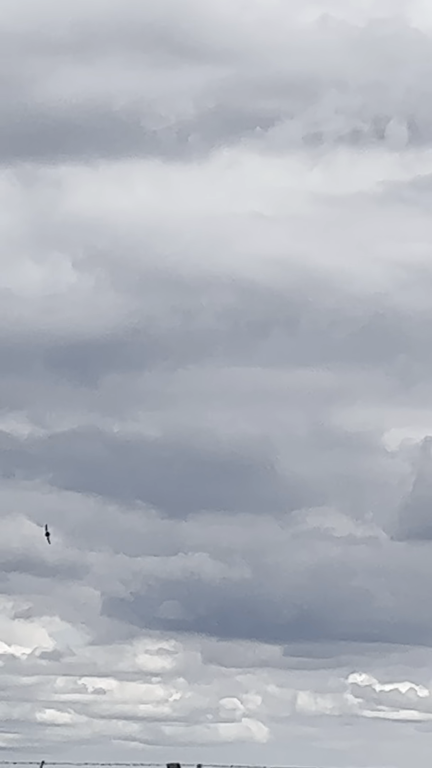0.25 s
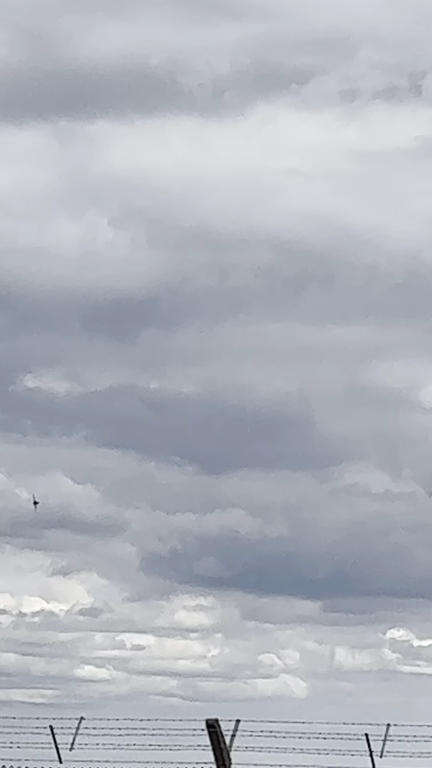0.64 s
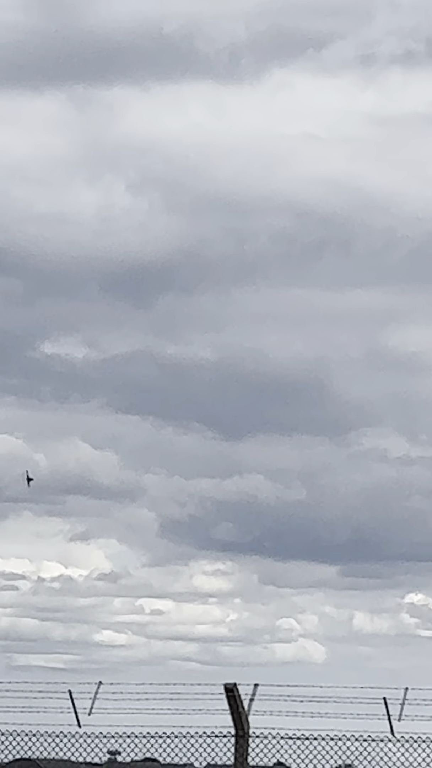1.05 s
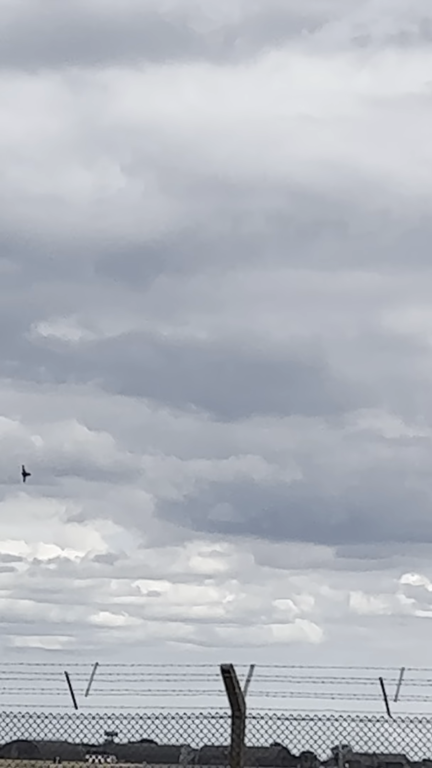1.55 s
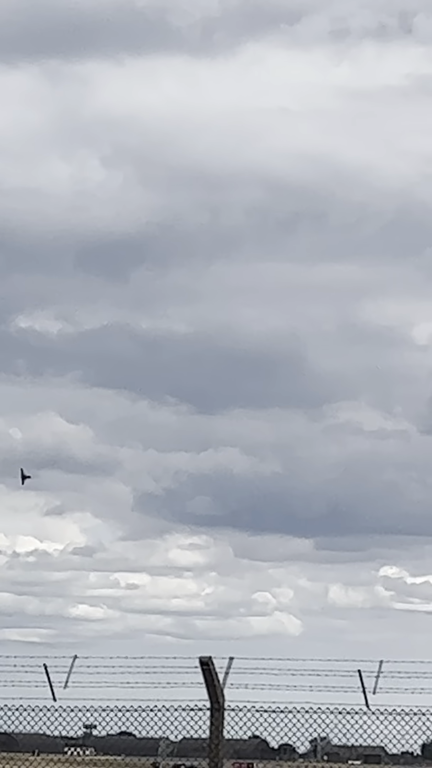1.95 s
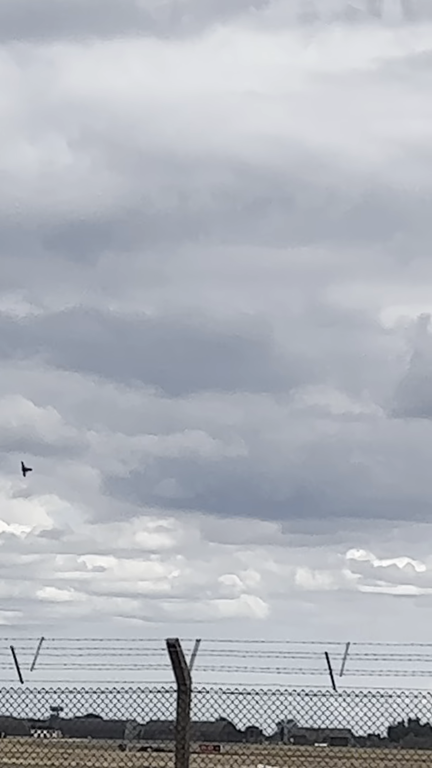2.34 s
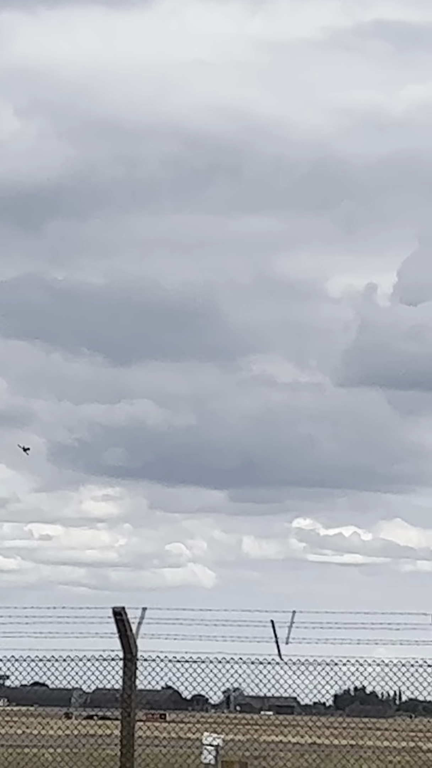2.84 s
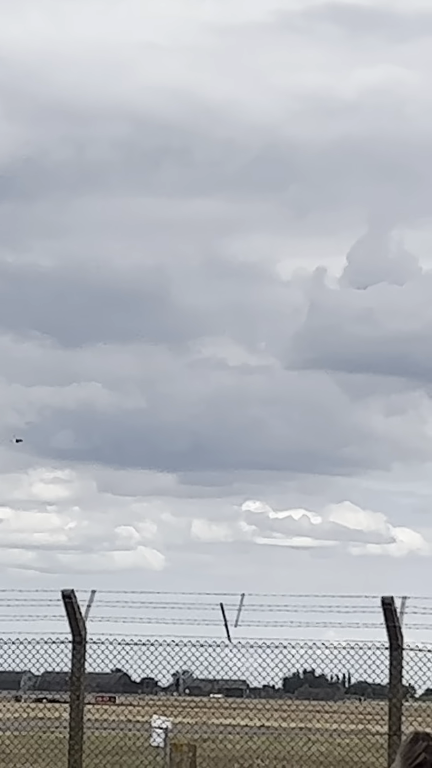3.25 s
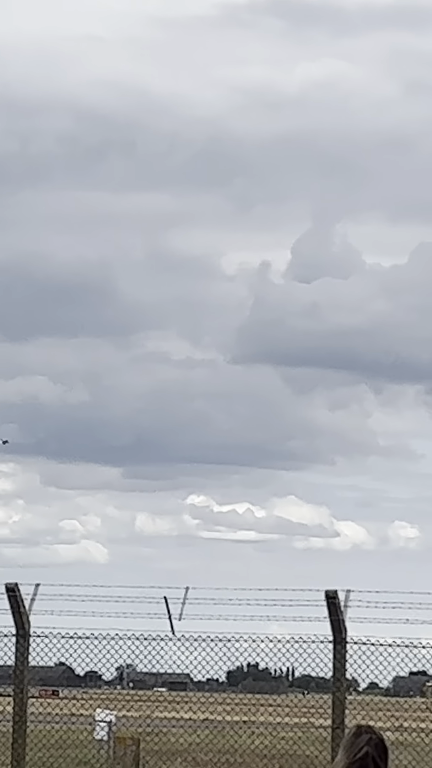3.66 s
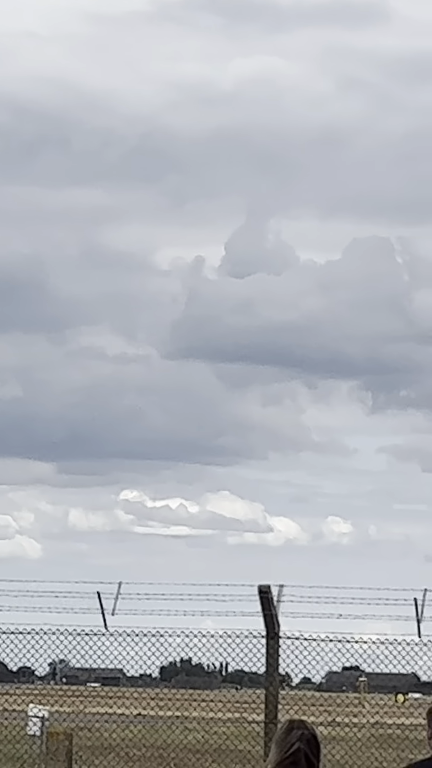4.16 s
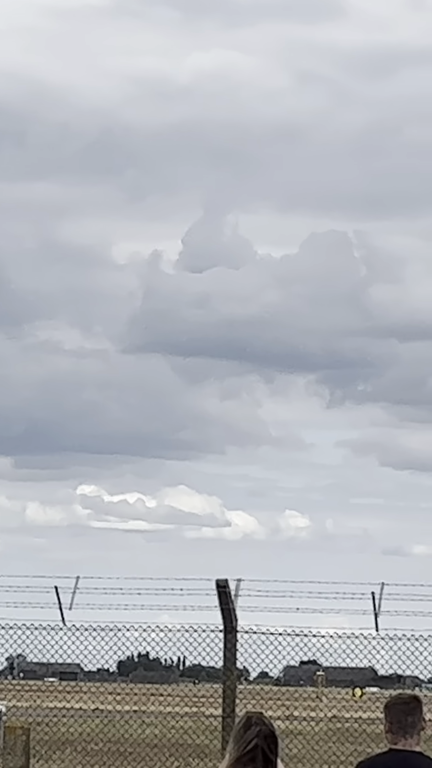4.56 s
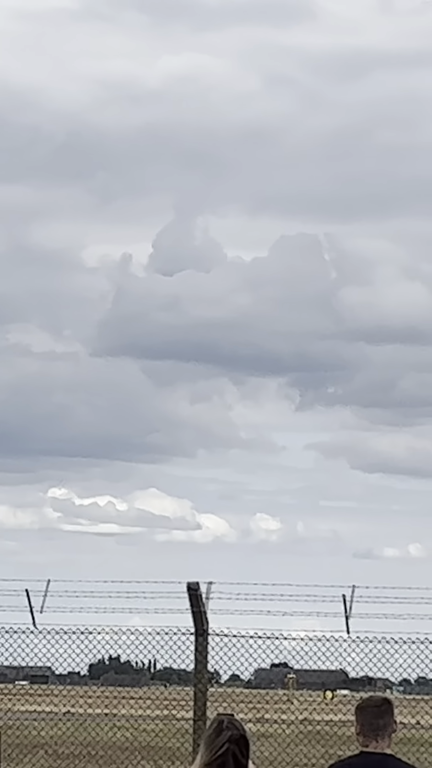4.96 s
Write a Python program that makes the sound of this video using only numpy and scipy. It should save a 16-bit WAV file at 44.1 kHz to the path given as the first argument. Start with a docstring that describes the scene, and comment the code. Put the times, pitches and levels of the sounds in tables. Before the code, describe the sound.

A twin-engine jet fighter flies away over an open airfield. Its loud, bassy exhaust roar surges and flutters in turbulent air, with small crackles and sharp cracks. A dense burst of crackle comes past the middle, then the roar darkens and sinks to distant rumble. Handheld outdoor stereo pickup, right side louder, with hardly any breeze.

```python
"""A bright exhaust roar is heard first: a twin-engine jet fighter flies away over an open airfield.
Mixing noise of its jets, made of noise bands, surges and fades in turbulent air, with sliding emphases.
Random small shocks crackle and listed strong shocks crack and thud on top: steps that relax, edges rounded.
Distance takes the treble first, leaving a rumble scattered by the field and the hangars.
A faint image of the low roar lies around 9.6 kHz, shifted up by a carrier; a breeze rustles below."""
import sys
import numpy as np
from scipy import signal
from scipy.fft import rfft, irfft, next_fast_len
from scipy.io import wavfile
from scipy.ndimage import uniform_filter1d, minimum_filter1d

SR = 44100
rng = np.random.default_rng(int(sys.argv[2]) if len(sys.argv) > 2 else 0)


def dump_mix(stems):
    """Bounce the given channels to the path in sys.argv[1] as a 16-bit WAV at rate SR."""
    frames = np.atleast_2d(stems).T  # one column per channel
    limited = np.clip(frames, -1, 1)  # hard clip at full scale
    pcm = np.round(limited * 32767).astype(np.int16)
    wavfile.write(sys.argv[1], SR, pcm)


N = 229529
TIME = np.arange(N) / SR
SIZE = next_fast_len(N + 8192)
FREQ = np.maximum(np.arange(SIZE // 2 + 1) * SR / SIZE, 1)
SIDES = np.array([[-1], [1]])   # left, right


def from_db(db):
    """Decibels to gain."""
    return 10 ** (np.asarray(db) / 20)


def rms_one(x):
    """Scale to unit power."""
    return x / np.sqrt(np.mean(np.abs(x) ** 2) + 1e-20)


def in_time(rows):
    """Each column of a curve at every sample."""
    s, *columns = np.transpose(rows)
    return [np.interp(TIME, s, c) for c in columns]


def at_hz(points, hz, axis=1):
    """One column of a table, read on a log-frequency axis."""
    table = np.array(points)
    return np.interp(np.log(hz), np.log(table[:, 0]), table[:, axis])


def bell(offset, width):
    """Smooth hump of height 1, the given width across at half height."""
    return .5 ** ((2 * offset / width) ** 2)


def drift(rate_hz):
    """Slow chance with a spread of 1: noise through two equal low-pass poles."""
    hop = 40
    r = np.exp(-2 * np.pi * rate_hz * hop / SR)
    settle = 2000
    noise = rng.standard_normal(N // hop + settle + 2)
    slow = signal.lfilter([1], [1, -2 * r, r * r], noise)[settle:]
    return np.interp(np.arange(N) / hop, np.arange(len(slow)), rms_one(slow))


def noise_spectrum(colour_db):
    """Spectrum of random noise with the given colour, scaled to unit-power weighting."""
    return rfft(rng.standard_normal(SIZE)) * rms_one(from_db(colour_db))


def band(spectrum, hz, step_oct):
    """Analytic signal of one band; bands step_oct apart add up to the whole."""
    weight = np.maximum(1 - np.abs(np.log2(FREQ / hz)) / step_oct, 0)
    return np.fft.ifft(2 * spectrum * weight, SIZE)[:N]


def steadied(z, evenness, window_s):
    """Hold back the slow chance swells of a noise band, keeping its fast grain."""
    power = uniform_filter1d(np.abs(z) ** 2, int(window_s * SR)) + 1e-20
    return z * (power / power.mean()) ** (-evenness / 2)


# the jet turns its tail and recedes:
# [t/s, deep rumble level/dB, roar level/dB, treble over roar level/dB]
RECEDING = [(0, 4, 2.5, 8), (.3, -4.5, -3.5, 8), (1.1, -2, 5.5, -1.5), (1.65, -0.5, -2, 2.5),
            (2.3, -5, -0.5, -3.5), (2.9, 1, 6, -10), (3.55, -2, -1.5, -5), (4.05, 2, -6, -4.5),
            (4.5, -3.5, -5, -12.5), (4.95, 3.5, -12, -7), (5.2, 11, -18.5, -1)]
RUMBLE_BELOW_HZ, TREBLE_ABOVE_HZ = 100, 1120


def passage_db(hz):
    """Slow level at one pitch: the deep rumble carries, the roar fades, the treble goes first."""
    rumble_db, roar_db, treble_db = in_time(RECEDING)
    deep = 1 / (1 + (hz / RUMBLE_BELOW_HZ) ** 2)
    treble = hz / (hz + TREBLE_ABOVE_HZ)
    return deep * rumble_db + (1 - deep) * roar_db + treble * treble_db


# a sharp focus sweeps over the listener, switching the roar on and off:
# [start t/s, end t/s, gain level/dB, centre f/Hz, breadth/octaves]
SHARP_FOCUS = [(0, .063, 5.5, 1700, 3.2), (.858, 0.97, 7.5, 300, 2.9), (0.945, .991, 9, 2600, 1.2),
               (1.198, 1.284, 3.5, 370, 7.5), (1.406, 1.52, 4.5, 703, 4.1), (1.974, 2.061, 8, 1300, 2.15),
               (2.173, 2.248, 8.5, 1026, 1.3), (2.743, 2.797, 9.5, 1350, 1.8), (2.756, 2.809, 7, 460, 1.9),
               (3.23, 3.302, 6.5, 220, 2.8)]
BURST_EDGE_S = .003   # tanh time constant


def bursts_db(hz):
    """Each burst holds its level between two steep edges, most strongly around its own pitch."""
    coarse = TIME[::32]
    gain_db = np.zeros(len(coarse))
    for start, end, db, centre_hz, breadth_oct in SHARP_FOCUS:
        opening = np.tanh((coarse - start) / BURST_EDGE_S)
        shutting = np.tanh((coarse - end) / BURST_EDGE_S)
        gain_db += db * (opening - shutting) / 2 * bell(np.log2(hz / centre_hz), breadth_oct)
    return np.interp(TIME, coarse, gain_db)


RISE_SHARE = 0.58   # part of a surge's length spent building up
SURGE_STEEPNESS = 2.2   # 2 is a bell, more is squarer


def swell(since_crest_s, length_s):
    """Hump with a full top that builds slowly and collapses faster; length is at half height."""
    flank_s = length_s * np.where(since_crest_s < 0, RISE_SHARE, 1 - RISE_SHARE)
    return .5 ** (np.abs(since_crest_s / flank_s) ** SURGE_STEEPNESS)


# turbulent air focuses the roar, or briefly bends it away (negative gain):
# [crest t/s, length/s, gain level/dB, centre f/Hz, breadth/octaves]
AIR_FOCUS = [(0.146, 0.098, 6.5, 2450, 0.66), (.16, 0.072, -3.5, 520, 0.71), (.245, .1, -5, 280, 0.45),
             (.37, 0.17, 7, 2400, 0.57), (0.258, 0.074, 6.5, 750, 1.2), (.4, 0.41, -6.5, 146.4, 1.27),
             (0.458, 0.063, 2, 1480, 7.7), (0.64, 0.045, 4, 300, 5.6), (.705, 0.068, -2, 300, 2.2),
             (0.813, 0.41, 6.5, 2500, 0.76), (0.851, 0.043, 7, 700, 3.4), (1.05, 0.062, -5, 300, 0.53),
             (1.25, 0.4, 2.5, 2450, .6), (1.122, 0.15, 4, 900, 0.8), (1.16, 0.038, -8, 520, .6),
             (1.335, 0.064, 3.5, 419, 4.8), (1.335, 0.042, -8, 1250, 0.43), (1.44, .08, 4.5, 200, 1),
             (1.56, 0.07, -7, 800, 0.9), (1.635, 0.071, -3.5, 400, 2.4), (1.726, 0.49, 5.5, 1266, 1.3),
             (1.834, 0.092, 5.5, 1870, 1.3), (1.8, 0.031, 11.5, 650, 0.33), (1.885, 0.12, 7, 322, 2.2),
             (1.925, 0.039, -5.5, 950, 0.73), (2.12, .07, -5.5, 700, 0.94), (2.254, 0.11, -5, 148, 1.8),
             (2.33, 0.029, 5.5, 900, 1.9), (2.44, 0.069, 7.5, 680, 2.3), (2.578, 0.064, 8, 650, 1.4),
             (2.635, 0.17, 9, 1000, 1.75), (2.634, 0.047, 7, 1450, 0.86), (2.705, .025, 5.5, 1200, 0.7),
             (2.73, 0.026, -3.5, 1154, 0.95), (2.86, 0.063, -7.5, 243, 1.2), (3.046, 0.56, 4, 200, 1.5),
             (3, 0.2, 2.5, 380, .7), (3.05, .09, 6.5, 100, 0.72), (3.275, 0.11, -9, 530, 0.42),
             (3.36, 0.055, -7, 353, 0.73), (3.48, .16, 4, 330, 0.78), (3.33, 0.25, 6.5, 100, 0.92),
             (3.457, 0.42, 9, 747, 10), (3.473, 0.047, 2.5, 1000, 2.8), (3.439, 0.3, -3, 1750, 0.72),
             (3.607, .07, 7.5, 1400, 0.46), (3.867, 0.22, 4, 300, 16), (4.17, 0.18, -4.5, 470, 0.49),
             (4.283, 0.065, 9.5, 700, 0.67), (4.3, 0.3, 3, 230, 0.93), (4.4, 0.59, 1.2, 1000, 1.3),
             (4.51, .07, -8.5, 320, 0.81), (4.639, 0.049, 4.5, 890, 3.5), (4.85, .12, -3.5, 350, 0.92),
             (4.995, 0.08, 6, 300, 0.77), (5, 0.45, -2.5, 2300, 0.7), (5.137, 0.14, -15, 524, 0.49)]


def surges_db(hz):
    """Each surge builds and collapses, most strongly around its own pitch."""
    coarse = TIME[::64]
    gain_db = np.zeros(len(coarse))
    for crest, length_s, db, centre_hz, breadth_oct in AIR_FOCUS:
        gain_db += db * swell(coarse - crest, length_s) * bell(np.log2(hz / centre_hz), breadth_oct)
    return np.interp(TIME, coarse, gain_db)


def roar_level_db(hz):
    """Passage, surges and bursts together at one pitch."""
    return passage_db(hz) + surges_db(hz) + bursts_db(hz)


def second_path(spectrum, share, lag_s, wander, rate_hz):
    """A second ray, bent by the wind, comes a little later: its comb sweeps through the noise."""
    x, n = irfft(spectrum, SIZE), np.arange(SIZE)
    lag = np.pad(lag_s * SR * np.exp(wander * drift(rate_hz)), (0, SIZE - N), mode="edge")
    return rfft(x + share * np.interp(n - lag, n, x)) / np.sqrt(1 + share ** 2)


# direct and reflected sound reinforce each other in a sliding band:
# [start t/s, length/s, from f/Hz, to f/Hz, emphasis level/dB before SLIDE_DB]
REINFORCED = [(0.065, .13, 464, 347, 4), (0.209, .14, 724, 1130, 1.5), (0.317, 0.19, 662, 335, 6),
              (0.716, 0.12, 642, 572, 8.5), (0.756, .26, 234, 197.8, 3), (0.855, 0.12, 526, 323, 0),
              (1.082, 0.083, 1166, 682, 3), (1.17, 0.13, 373, 350, 10.5), (1.097, 0.33, 259.4, 258.7, 7.5),
              (1.285, .14, 620, 241, 8.5), (1.441, 0.15, 329.5, 486, 11.5), (1.791, 0.2, 371, 305, 5),
              (1.813, 0.33, 132.5, 103.2, 12.5), (2.536, .14, 654, 572, 5), (2.809, 0.06, 825, 734, 8),
              (2.858, 0.31, 393, 427, 7), (2.945, 0.53, 301, 209.4, 6), (3.197, 0.22, 297, 240, -2),
              (3.257, 1, 143.2, 68.5, 7.5), (3.794, 0.17, 229, 218, 8), (4.046, 0.098, 270, 201.7, 8),
              (4.206, 0.14, 375.4, 351, 3), (4.577, 0.14, 434, 487, 3.5)]
SLIDE_DB = 1   # added to every emphasis


def sliding_bands(spectrum, width, trough_width, evenness):
    """Each reinforced band fades in, glides and out, troughs beside it; widths are shares of its pitch."""
    x = irfft(spectrum, SIZE)
    out = x.copy()
    for start, length_s, from_hz, to_hz, db in REINFORCED:
        during = np.flatnonzero((TIME > start) & (TIME < start + length_s))
        progress = (TIME[during] - start) / length_s
        glide_hz = from_hz * (to_hz / from_hz) ** progress
        glide = np.exp(2j * np.pi * np.cumsum(glide_hz) / SR)
        # follow the glide, so the band stands still around 0 Hz
        around = np.fft.fft(x[during] / glide)
        offset = np.fft.fftfreq(len(during), 1 / SR) / np.sqrt(from_hz * to_hz)
        broad = np.fft.ifft(around * bell(offset, trough_width))
        narrow = np.fft.ifft(around * bell(offset, width))
        strength = np.sqrt(np.mean(np.abs(broad) ** 2) * width / trough_width)
        narrow = strength * rms_one(steadied(narrow, evenness, window_s=0.023))
        change = (from_db(db + SLIDE_DB) * narrow - broad) * glide
        out[during] += 2 * np.sin(np.pi * progress) * change.real
    return rfft(out)


# [t/s, right-side lead/ms at full openness (negative: left leads),
#  right over left level/dB at full shading, scattered share/0-1 at full openness]
SIDE_ARRIVAL = [(0, .17, 5.5, .04), (1.0, .14, 5, .04), (1.4, .1, 5, .1), (1.62, .04, 3.5, .45),
                (1.9, .04, 6, .08), (2.5, .02, 8, .05), (3.0, .04, 8, .12), (3.45, .02, 7.5, .03),
                (4.1, 0, 6, .1), (4.33, -.05, 5.5, .3), (4.6, -.03, 6, .1), (4.9, -.15, 1.5, .6),
                (5.2, -.35, 1, .6)]
# difference of the two sides: [f/Hz, shading/0-1, openness/0-1]
SIDE_DIFFERENCE = [(60, .1, .8), (150, .2, 1), (300, .36, 1), (480, .55, 1), (640, .9, 1), (830, .5, 1),
                   (1100, 1, 1), (1350, .9, .8), (1700, .12, .16), (2200, .01, .03)]
# relative exhaust spectrum: [f/Hz, density level/dB per Hz]
EXHAUST_COLOUR = [(20, -43), (31, -22), (50, 1.5), (80, -1.5), (118, 1.5), (200, 1), (320, 0.5),
                  (450, -0.1), (700, -3.5), (1350, -13.5), (1680, -20), (2450, -28), (3150, -37),
                  (4100, -55), (7000, -101)]
EXHAUST_DB = -24   # before passage, surges and bursts


def exhaust(flutter_db, patchy_db, rasp_db):
    """Mixing noise of the receding jets; turbulent air makes it surge and flutter."""
    colour_db = at_hz(EXHAUST_COLOUR, FREQ)
    direct = second_path(noise_spectrum(colour_db), share=0.41, lag_s=.011, wander=0.4045, rate_hz=0.64)
    direct = sliding_bands(direct, width=0.3, trough_width=0.44, evenness=0.47)
    scattered = noise_spectrum(colour_db)
    lead_ms, right_db, share = in_time(SIDE_ARRIVAL)
    diffuse = np.clip(share, 0, 1) / 2
    flutter, rasp = drift(13), drift(110)
    out, step_oct = np.zeros((2, N)), 1 / 3
    for hz in 20 * 2 ** np.arange(0, 8.5, step_oct):
        level_db = roar_level_db(hz)
        # short waves are disturbed most, and leave the jets in bursts
        shortness = hz / (hz + 700)
        level_db += shortness * (flutter_db * flutter + rasp_db * rasp) + patchy_db * drift(16)
        # the right is louder; it leads at first, the left near the end; scattered sound widens both
        shading = at_hz(SIDE_DIFFERENCE, hz, axis=1)
        openness = at_hz(SIDE_DIFFERENCE, hz, axis=2)
        turn_rad = np.clip(np.pi * hz * lead_ms / 1000 * openness, -.7, .7)
        ports = from_db(SIDES * shading * right_db / 2) * np.exp(1j * SIDES * turn_rad)
        width = openness * np.sqrt(diffuse / (1 - diffuse))
        wave = steadied(band(direct, hz, step_oct), evenness=0.31, window_s=0.16)
        both = wave * ports / ports.mean(axis=0)
        both = both + SIDES * width * band(scattered, hz, step_oct)
        out += from_db(level_db) * both.real
    return from_db(EXHAUST_DB) * out


IMAGE_HZ, IMAGE_DB = 9570, -62.5   # carrier; gain on the low roar


def roar_image(roar, below_hz):
    """Faint image of the low roar on both sides of a high carrier, which it multiplies."""
    low = signal.sosfilt(signal.butter(4, below_hz, fs=SR, output="sos"), roar)
    return from_db(IMAGE_DB) * low * np.cos(2 * np.pi * IMAGE_HZ * TIME)


# relative rustle spectrum: [f/Hz, density level/dB per Hz]
RUSTLE_COLOUR = [(100, -8), (1000, -15.5), (3000, -30), (5000, -28), (6500, -30.5), (8000, -37),
                 (10000, -58.5)]
# rustle before its random drift: [t/s, level/dB]
RUSTLE_LEVEL = [(0, -78), (4.5, -72), (4.64, -71), (4.77, -80), (4.92, -69), (5.0, -67), (5.06, -69),
                (5.15, -66.5), (5.2, -58)]


def air(rustle_db, rustle_hz):
    """Faint, uneven rustle of the breeze in the open field; independent noise on each side."""
    level_db = in_time(RUSTLE_LEVEL)[0] + rustle_db * drift(rustle_hz)
    colour_db = at_hz(RUSTLE_COLOUR, FREQ)
    noise = np.array([irfft(noise_spectrum(colour_db), SIZE)[:N] for side in range(2)])
    return from_db(level_db) * noise


def shock_fronts(clicks, low_hz, air_hz):
    """Each shock is a sudden rise of pressure that relaxes, its edge rounded by the air."""
    steps = signal.lfilter([1], [1, -np.exp(-2 * np.pi * low_hz / SR)], clicks + 1e-18)
    relaxed = signal.sosfilt(signal.butter(2, low_hz, "high", fs=SR, output="sos"), steps)
    absorption = signal.butter(4, air_hz, fs=SR, output="sos")
    return signal.sosfilt(absorption, signal.sosfilt(absorption, relaxed))


def edge(x, hz):
    """The sharp part of a sound."""
    return signal.sosfilt(signal.butter(6, hz, "high", fs=SR, output="sos"), x)


# the exhaust points at the listener and the crackle flares (negative gain: dips):
# [crest t/s, length/s, gain level/dB]
CRACKLE_FLARES = [(0.034, 0.082, 6), (.165, 0.02, 4), (0.467, 0.028, 7), (0.65, 0.037, 7),
                  (0.851, .06, 8.5), (1.83, 0.052, -1), (2.018, .06, 3), (2.34, 0.045, 9),
                  (2.633, 0.11, 11), (2.762, 0.042, 7), (3.237, 0.043, 9), (3.393, 0.39, 13.5),
                  (3.55, 0.047, 8.5), (3.853, 0.17, 10.5)]
CRACKLE_FOLLOWS_HZ = 3440   # small shocks grow with the roar at this pitch


def crackle(per_s, spread_db, level_db, contrast):
    """Small shocks of uneven size arrive in dense clumps, stronger when the roar is louder."""
    born = rng.random(N) < per_s * from_db(3 * drift(60)) / SR
    sizes = from_db(spread_db * np.minimum(rng.exponential(1, N), 2.5))
    fronts = shock_fronts(born * sizes, low_hz=1000, air_hz=3750)
    unit_fronts = fronts / np.std(edge(fronts, hz=3850))
    roar_db = roar_level_db(CRACKLE_FOLLOWS_HZ)
    flare_db = sum(db * bell(TIME - s, length_s) for s, length_s, db in CRACKLE_FLARES)
    return unit_fronts * from_db(level_db + contrast * roar_db + flare_db)


# strongest shocks, levels before each function's level_db:
# [t/s, sharp edge peak level/dB, dull body peak level/dB, ragged trail decay/s]
STRONG_SHOCKS = [(.162, -53, -25, .005), (.472, -49.5, -24, 0.0055), (0.642, -51.5, -27, .005),
                 (.9594, -36, -16, 0.00101), (0.963, -48, -12, .002), (0.9786, -44, -26, .003),
                 (0.987, -40, -15, .003), (1.189, -64.5, -15, .002), (1.247, -51, -9, .006),
                 (1.269, -56, -14.5, .003), (1.344, -59, -19, .002), (1.691, -63, -25, .002),
                 (1.966, -59.5, -16, .002), (2.63, -52, -21, .003), (2.748, -52, -8.5, .003),
                 (2.798, -55, -16, .002), (3.229, -42, -12, .006), (3.239, -50, -16, .005),
                 (3.2928, -50, -15, .003), (3.3475, -38, -17, .006), (3.376, -44, -17, .005),
                 (3.385, -40, -26.5, .008), (3.398, -47, -15, .005), (3.412, -48, -18, .005),
                 (3.4289, -38, -9, .002), (3.435, -38.5, -6, .003), (3.446, -38, -14, .003),
                 (3.4505, -45.5, -11.5, .003), (3.4609, -33, -8, .001), (3.466, -36, -21, .001),
                 (3.47, -37, -23, .001), (3.473, -43, -12, .001), (3.4768, -31, -12, .001),
                 (3.481, -45, -13, .001), (3.4848, -45, -17, .001), (3.4873, -42, -13, .001),
                 (3.4938, -45, -15, .002), (3.498, -45, -16, .002), (3.504, -38, -14, .003),
                 (3.5202, -42, -19, .003), (3.5252, -45, -29, .003), (3.5503, -37, -24, .001),
                 (3.5558, -43, -28.5, .001), (3.5605, -46, -32, .002), (3.5895, -53, -25, .002),
                 (3.8175, -46, -27, .008), (4.26, -68, -31, .003)]


def cracks(level_db, low_hz, air_hz, trail):
    """The strongest shocks stand out; wrinkled by the air, each front drags a ragged trail."""
    age = TIME[:round(.03 * SR)]
    click = 1. * (age == 0)
    clicks = np.zeros(N)
    for s, edge_db, _, trail_s in STRONG_SHOCKS:
        start = round(s * SR)
        ragged = trail * np.exp(-age / trail_s) * rng.standard_normal(len(age))
        clicks[start:start + len(age)] += from_db(edge_db) * (click + ragged)
    unit_edge = np.abs(edge(shock_fronts(click, low_hz, air_hz), hz=3400)).max()
    return shock_fronts(clicks, low_hz, air_hz) * from_db(level_db) / unit_edge


def thuds(level_db, low_hz, top_hz):
    """With each sharp edge comes the dull body of the shock, louder on the right like the roar."""
    s, _, body_db, _ = np.transpose(STRONG_SHOCKS)
    clicks = np.zeros(N)
    clicks[np.round(s * SR).astype(int)] = from_db(body_db + level_db)
    unit_body = np.abs(shock_fronts(1. * (TIME[:2048] == 0), low_hz, top_hz)).max()
    right_db = in_time(SIDE_ARRIVAL)[1]
    return shock_fronts(clicks, low_hz, top_hz) / unit_body * from_db(SIDES * right_db / 2)


def scene():
    """Roar and its faint image, crackle, cracks and thuds over the quiet field."""
    roar = exhaust(flutter_db=0.5, patchy_db=1.5, rasp_db=0.5)
    image = roar_image(roar, below_hz=450)
    breeze = air(rustle_db=1.5, rustle_hz=35)
    small_shocks = crackle(per_s=900, spread_db=2.5, level_db=-76.0, contrast=0.95)
    sharp_edges = cracks(level_db=-2.5, low_hz=850, air_hz=4470, trail=0.12)
    dull_bodies = thuds(level_db=1.5, low_hz=650, top_hz=1400)
    return roar + image + breeze + small_shocks + sharp_edges + dull_bodies


CUTOFF_HZ, FADE_S = 10300, .008


def record(dry):
    """A limiter holds the highest peaks, the ends fade softly and the top is cut."""
    reach = round(.004 * SR)
    allowed = np.minimum(1, .89 / (np.abs(dry).max(axis=0) + 1e-9))
    held = minimum_filter1d(allowed, 2 * reach)
    gain = uniform_filter1d(uniform_filter1d(held, reach), reach)
    fade = np.clip(np.minimum(TIME, TIME[-1] - TIME) / FADE_S, 0, 1)
    top_cut = signal.ellip(10, .1, 80, CUTOFF_HZ, fs=SR, output="sos")
    return signal.sosfilt(top_cut, dry * gain * fade)


dry = scene()
out = record(dry)
dump_mix(out)
```